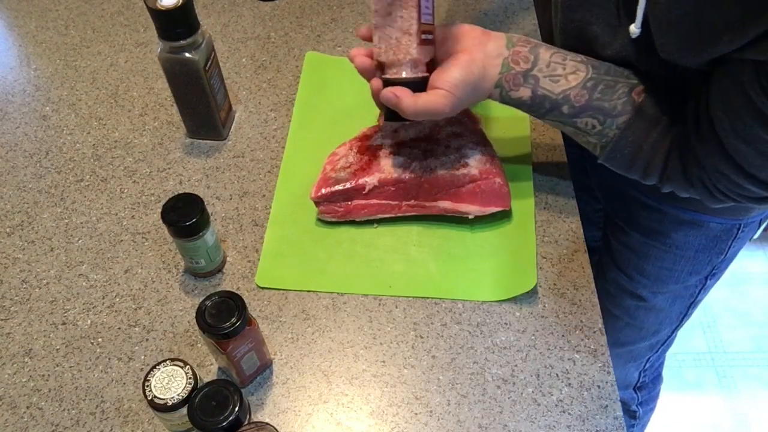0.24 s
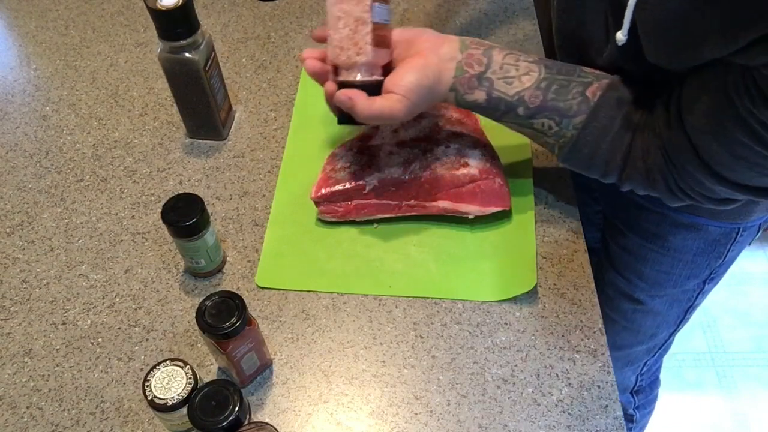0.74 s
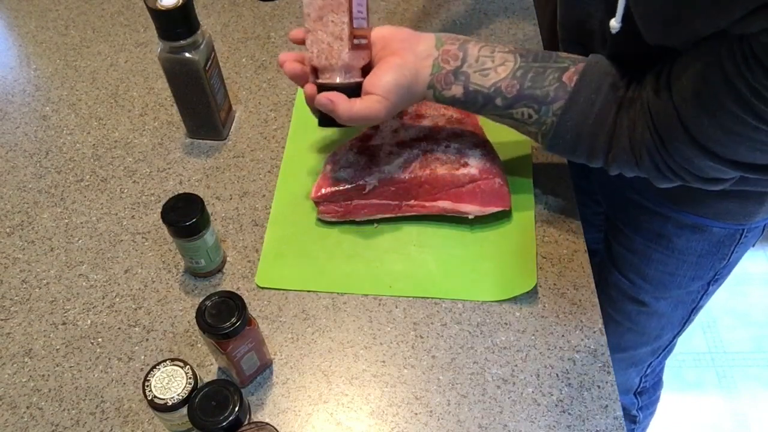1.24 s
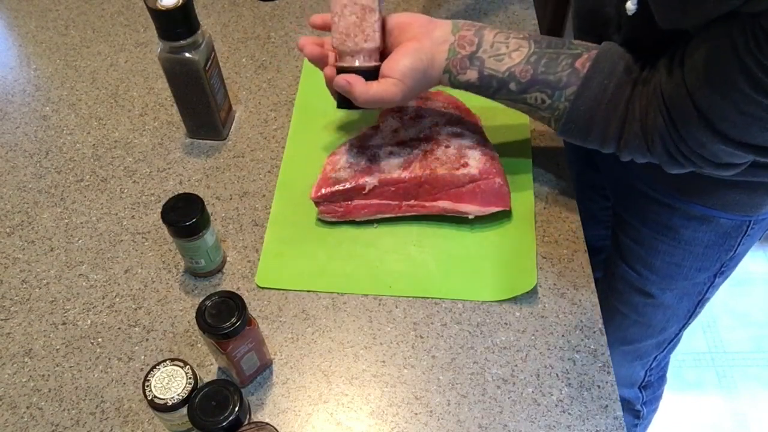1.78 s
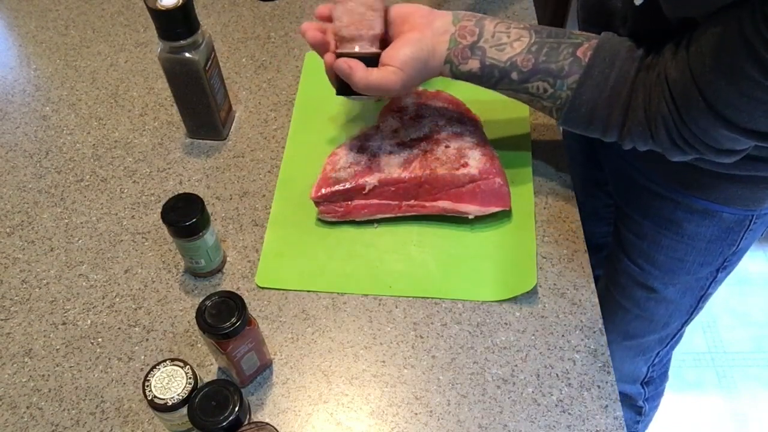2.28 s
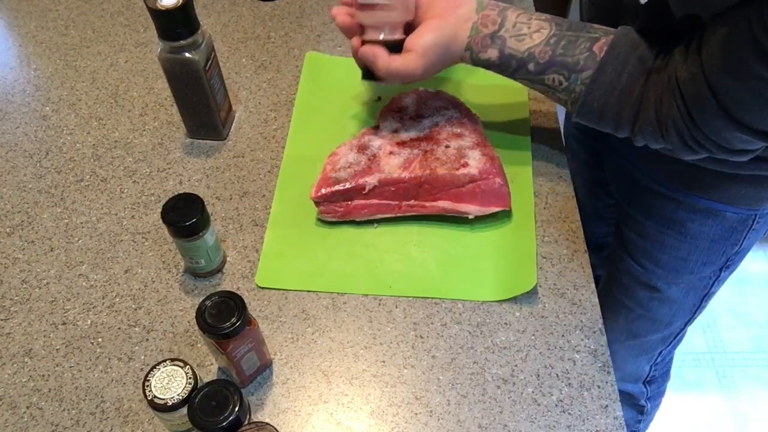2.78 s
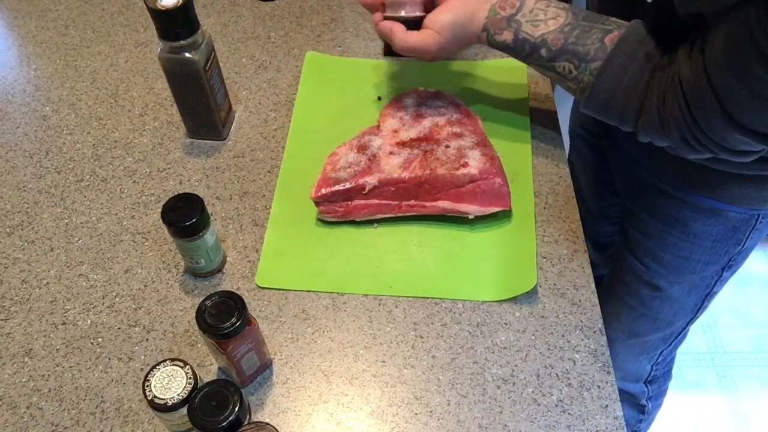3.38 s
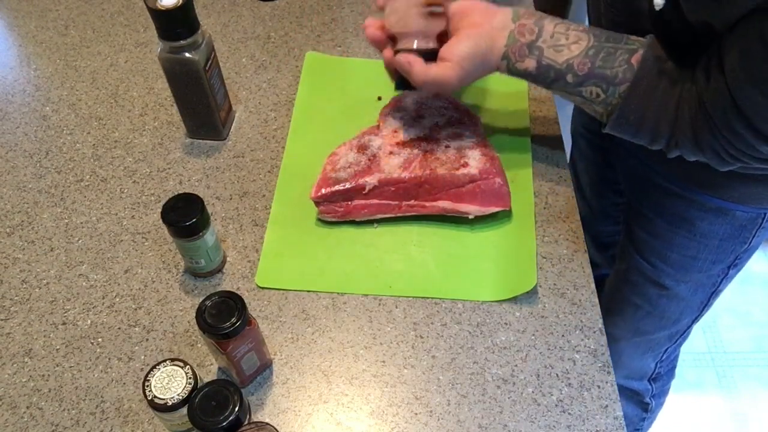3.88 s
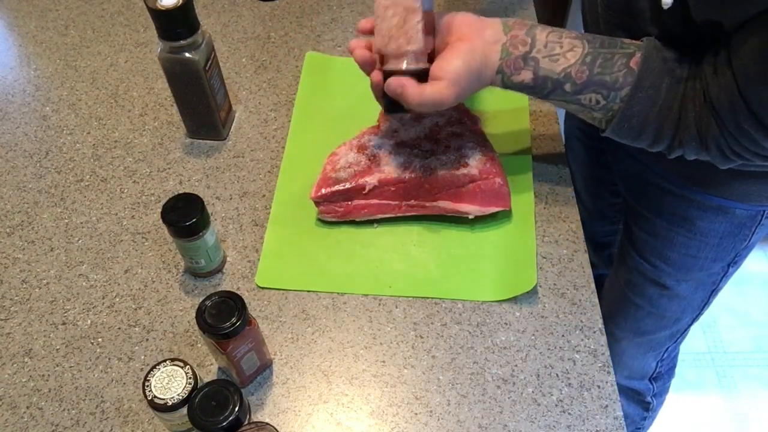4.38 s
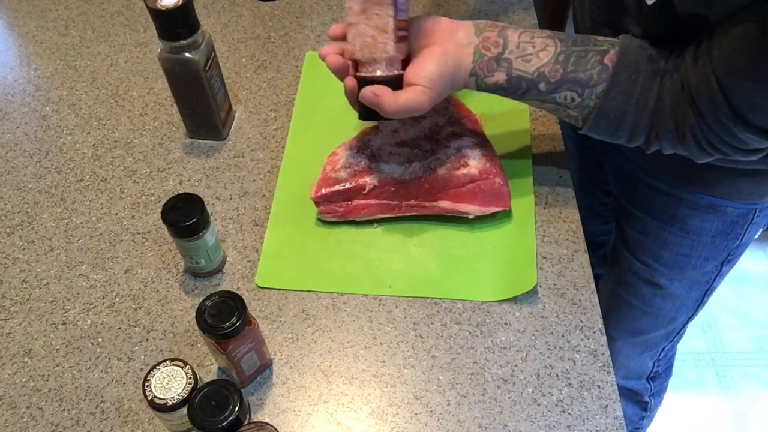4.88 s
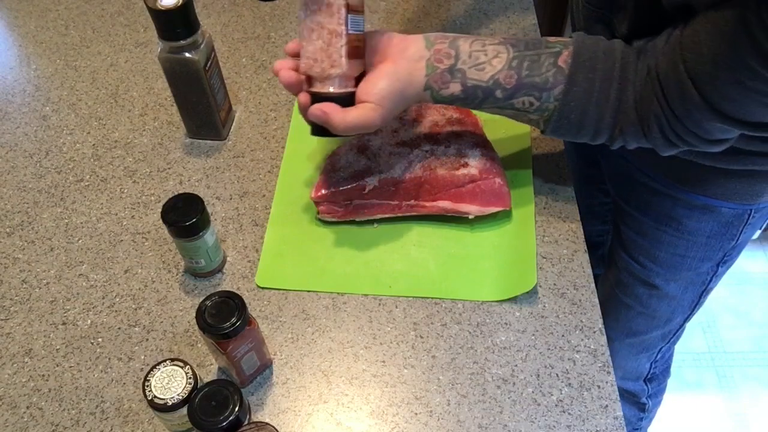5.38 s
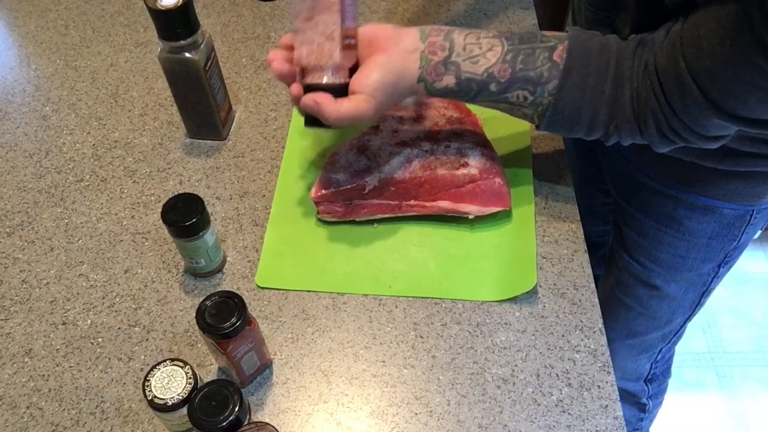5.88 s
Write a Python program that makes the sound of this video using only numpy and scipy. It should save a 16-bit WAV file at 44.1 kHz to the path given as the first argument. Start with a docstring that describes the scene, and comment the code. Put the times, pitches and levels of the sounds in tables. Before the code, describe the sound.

Eleven brief, gritty crunches come at even intervals, each about a quarter second or less, from coarse salt crushed in a hand mill. The crunch brightens into a fine scrape, sometimes ending in a snappy plastic click. In the short gaps, crystals tick lightly and a cap squeaks very faintly. Close mono microphone, slight kitchen reflections with a short tail, quiet low hum.

```python
"""Salt grinder over a kitchen counter

In a kitchen, close to a single microphone, a hand-twisted grinder makes eleven twists in an even rhythm. Each
twist crushes coarse crystals (clicks through splinter colours and ringing teeth), then rasps fine salt. Single
crystals crack, the housing knocks, the rubbed housing squeaks and the plastic burr snaps free with a ring;
between twists loose salt ticks in the mill. Echoes and a short tail answer, over a hum and soft room noise."""
import sys
import numpy as np
from scipy import signal
from scipy.fft import rfft, irfft
from scipy.io import wavfile
from scipy.ndimage import uniform_filter1d

SR = 44100
rng = np.random.default_rng(int(sys.argv[2]) if len(sys.argv) > 2 else 0)


def output_pcm(signal):
    """Save a mono or channel-first signal as 16-bit PCM at the path in sys.argv[1].

    Samples are clipped to [-1, 1] before scaling.
    """
    pcm = np.clip(np.atleast_2d(signal).T, -1, 1) * 32767
    wavfile.write(sys.argv[1], SR, np.round(pcm).astype(np.int16))


N = 270774  # samples, about 6.1 s

# Levels of the grinder's sounds are nominal: gains in the functions and in scene() come on top.
# appliance hum: (frequency [Hz], mean level [dB rms])
HUM_TONES = [(56.5, -80), (119.9, -60), (282.8, -70), (337.8, -66)]
# colour of the room noise: (frequency [Hz], density [dB per Hz])
AIR_COLOUR = [(15, 2), (30, -20), (45, 6.5), (85, 3), (140, 5.5), (210, 2), (360, 0), (480, -8), (900, -8),
              (1500, -12), (3000, -16), (6000, -18), (15000, -39)]
AIR_DB = -59.5  # rms

# twists of the hand: (teeth bite [s], full force [s], hand lets go [s], crushing [dB], rasp [dB],
#   last push [dB], weaker at the bite by [dB], crunch pitch at the start [Hz], and at the end [Hz])
HAND_TWISTS = [(-0.06, 0.004, 0.16, -38, -44.5, 0.5, 6, 2300, 3500),
               (0.455, 0.557, 0.74, -37.5, -44.5, -1, 18.5, 2260, 3400),
               (1.05, 1.118, 1.274, -37, -46, 4.5, 12, 2300, 3900),
               (1.619, 1.682, 1.813, -36, -44.5, 5, 11, 2300, 3000),
               (2.227, 2.249, 2.445, -37, -46, -1, 7, 2050, 3500),
               (2.78, 2.84, 3.003, -35.5, -46.5, 1, 14, 2500, 3100),
               (3.362, 3.411, 3.543, -34.5, -43.5, -2, 9, 2100, 3900),
               (3.942, 4.016, 4.165, -36, -45, 0.5, 11, 2000, 3200),
               (4.495, 4.566, 4.734, -36, -43.5, -3, 7, 2150, 3600),
               (5.025, 5.106, 5.27, -36.5, -45.5, 2, 13.5, 2070, 3100),
               (5.602, 5.662, 5.82, -37, -47, 4, 7, 1800, 3500)]
# the mill sticks for a moment: (middle [s], length [s], drop [dB], a negative drop is a rise)
MILL_STALLS = [(0.018, .012, 3.5), (1.739, 0.016, 3), (2.442, .025, 5.5), (2.811, 0.022, 4.5),
               (3.393, 0.018, 10), (3.488, 0.014, 3.5), (5.19, 0.032, 1), (5.75, 0.023, -1)]
BITE_DB_PER_S, RELEASE_DB_PER_S = 836, 169  # how fast a twist starts and stops
BUILD_CURVE = 1.43  # the force grows ever faster from the bite on
RASP_FOLLOWS = 0.87  # share of that growth in the rasp
COARSE_LAST_S, SPENT_DB_PER_S = 0.035, 211  # the coarse crystals last a moment, then are used up
LEFTOVER_DB = -1  # crushing of the fragments, relative to the rasp
MID_SAG_DB = 1  # the hand eases between the crunch and the last push
PUSH_S = 0.027  # decay time on either side of the last push of the wrist

# colour of crushed crystals: (frequency [Hz], density [dB per Hz])
CRUSH_COLOUR = [(50, -52), (150, -32), (400, -16.5), (620, -20.5), (800, -22), (1000, -9), (1400, -5.5),
                (2000, 1), (2600, -0.5), (3300, 0), (4200, -7.5), (6000, -12.5), (15000, -26.5)]
# colour of fine salt on the burr: (frequency [Hz], density [dB per Hz])
RASP_COLOUR = [(500, -44.5), (1500, -6), (2500, -6), (3600, 1), (4400, 0), (4850, -10), (5600, 1),
               (6200, -7), (6750, -2), (7500, -11), (9500, -9.5), (10500, -21.5), (11800, -12.5),
               (15800, -23.5)]
# ring of the burr: (multiple of its main ring [ratio], level [dB], decay t60 [s])
BURR_MODES = [(.41, -11, 0.035), (.56, -10.5, 0.011), (.74, -4, 0.013), (1.0, 0.5, 0.022),
              (1.34, -27, 0.0086), (1.6, -9, 0.028)]

# echoes from the counter and a wall: (delay [s], level [dB])
ROOM_ECHOES = [(.0036, -22.5), (0.0189, -30)]
# moments when the hand takes a new grip and moves the grinder: (time [s])
REGRIP_TIMES = [.39, .94, 1.5, 2.13, 2.68, 3.25, 3.83, 4.38, 4.94, 5.48]

# hollow knocks as the hand grips or a big crystal gives: (time [s], peak [dB], pitch [Hz])
HOUSING_KNOCKS = [(.040, -41, 630), (.390, -51.5, 950), (.657, -45, 555), (1.508, -44.5, 680),
                  (2.272, -42, 547), (2.333, -41, 930), (2.687, -46.5, 770), (4.036, -42, 610),
                  (4.064, -45, 660), (4.957, -42.5, 850), (5.061, -42, 745)]
# modes of the hand-damped housing: (multiple of the pitch [ratio], level [dB], decay t60 [s])
HOUSING_MODES = [(.66, -5.5, 0.039), (1.0, 6.5, 0.018), (1.35, 4.5, 0.012), (1.75, -5, 0.029),
                 (3.1, -26, 0.01)]
# single crystals that crack: (time [s], peak [dB], centre that sets the brightness [Hz])
CRYSTAL_CRACKS = [(0.0402, -19, 2660), (0.1045, -23, 3770), (0.391, -44.5, 2200), (0.452, -37, 3115),
                  (0.604, -28, 2570), (0.6424, -24, 2970), (0.656, -26, 2580), (0.6892, -23.5, 4010),
                  (0.9413, -36.5, 4150), (1.046, -35, 2770), (1.0635, -28, 2130), (1.6106, -35, 3080),
                  (1.6402, -24, 2570), (1.9691, -37.5, 3390), (2.2338, -23, 2590), (2.3323, -24, 2130),
                  (2.6874, -31.5, 3860), (2.7796, -26.5, 3040), (2.81, -26, 3570), (2.872, -17.5, 3200),
                  (3.003, -29, 2500), (3.2686, -38, 3630), (3.364, -27, 2400), (3.406, -21, 2640),
                  (3.6757, -34, 3720), (3.838, -39, 2840), (4.0337, -30, 2510), (4.0627, -24, 2970),
                  (4.106, -24.5, 3260), (4.3323, -42, 3550), (4.4953, -31, 2180), (4.5073, -26, 2490),
                  (4.5688, -23.5, 3090), (4.643, -23, 3260), (4.7424, -28, 3070), (4.8021, -34, 2970),
                  (4.9574, -35, 2360), (5.06, -39, 2310), (5.101, -27, 3320), (5.5188, -34.5, 3250),
                  (5.5966, -32, 2290), (5.6788, -29, 2188), (5.702, -31, 2710)]
# colour of a crack: (frequency [Hz], density [dB per Hz])
CRACK_COLOUR = [(60, -47), (200, -30), (900, -12), (2000, 5.5), (3600, 6), (7000, -8), (10500, -20),
                (12500, -25), (16000, -18)]
# the housing sings faintly as the hand rubs it: (start [s], end [s], nominal pitch [Hz], level [dB])
HOUSING_SQUEAKS = [(0.176, .46, 1665, -69.5), (.18, .46, 3300, -74), (3.62, 3.94, 3200, -71.5),
                   (4.944, 5.037, 3330, -66)]
# loose salt shifts in the mill as the hand turns back: (start [s], end [s], level [dB])
SALT_SHIFTS = [(0.397, 0.48, -65), (0.933, 1.045, -64), (1.494, 1.507, -65.5), (1.973, 2.016, -59.5),
               (2.08, 2.2, -69.5), (2.56, 2.596, -65.5), (2.696, 2.715, -67), (3.115, 3.164, -64.5),
               (3.243, 3.35, -60.5), (3.671, 3.686, -60), (3.84, 3.93, -67.5), (4.276, 4.33, -66.5),
               (4.384, 4.48, -63.5), (4.961, 5.03, -59.5), (5.485, 5.59, -63.5), (5.965, 6.078, -62.5)]
SHIFT_RISE_DB_PER_S, SETTLE_DB_PER_S = 1500, 155
# colour of loose salt: (frequency [Hz], density [dB per Hz])
LOOSE_COLOUR = [(300, -26), (900, -9.5), (1700, -2.5), (2500, -2), (3600, 1.5), (5000, -5), (7000, -8),
                (10500, -17.5), (15800, -22)]
# the burr catches and snaps free: (time of release [s], level [dB], main ring [Hz])
BURR_SNAPS = [(1.2639, -28, 4050), (1.272, -27, 4080), (1.2774, -24, 4150), (1.2826, -26.5, 3950),
              (1.817, -37.5, 4060), (2.457, -27.5, 4320), (2.9804, -31, 4080), (2.9993, -32.5, 4080),
              (3.5205, -32.5, 4400), (3.558, -31, 4260), (4.1566, -32.5, 3990), (5.2428, -32, 3870),
              (5.2587, -31, 4084), (5.814, -25.5, 4010), (5.821, -28.5, 3980)]

CUTOFF_HZ = 15820


def from_db(db):
    """Decibels to gain."""
    return 10 ** (np.asarray(db) / 20)


def rms_one(x):
    """Scale to an rms of 1."""
    return x / np.sqrt(np.mean(x ** 2) + 1e-20)


def peak_one(x):
    """Scale to a peak of 1."""
    return x / np.abs(x).max()


def add(out, s, sound):
    """Mix a short sound in at s seconds."""
    start = max(round(s * SR), 0)
    out[start:start + len(sound)] += sound[:N - start]


def through(x, pulse):
    """Pass a sound through an impulse response."""
    return signal.oaconvolve(x, pulse)[:N]


def drift(rate):
    """Random wander: `rate` new normal values a second, joined by straight lines."""
    steps = rng.standard_normal(4096)
    return np.interp(np.arange(N) / SR * rate, np.arange(len(steps)), steps)


def response(spectrum, uneven_db=0, size=1024, count=40):
    """Causal impulse response of unit energy with this colour and random bumps on it."""
    log_hz = np.log(np.maximum(np.arange(size // 2 + 1) * SR / size, 1))
    hz, db = np.transpose(spectrum)
    bump_places = np.linspace(np.log(hz[0]), np.log(hz[-1]), count)
    bumps = np.interp(log_hz, bump_places, rng.standard_normal(count))
    colour_db = np.interp(log_hz, np.log(hz), db) + uneven_db * bumps
    # folding the cepstrum onto positive times gives minimum phase
    cepstrum = irfft(np.log(from_db(colour_db)))
    cepstrum[1:size // 2] *= 2
    cepstrum[size // 2 + 1:] = 0
    pulse = irfft(np.exp(rfft(cepstrum)))
    return pulse / np.linalg.norm(pulse)


def struck(modes, hz=1, size=2048):
    """One blow on a set of decaying modes, each struck with a strength of its own; unit energy."""
    t = np.arange(size) / SR
    ring = np.zeros(size)
    for k, (ratio, db, t60) in enumerate(modes):
        decay = from_db(db + rng.normal(0, 0.27) - 60 * t / t60)
        ring += decay * np.sin(2 * np.pi * hz * ratio * t) * (-1) ** k
    return ring / np.linalg.norm(ring)


def fractures(per_s, spread_db, clump_db, clump_rate, size=900):
    """Clicks of uneven size that come in small avalanches, their local power held nearly steady."""
    uneven_db = spread_db * np.minimum(rng.exponential(1, N), 4)
    sizes = from_db(uneven_db + clump_db * drift(clump_rate))
    happens = rng.random(N) < per_s / SR
    clicks = sizes * rng.choice([-1, 1], N) * happens
    local_power = uniform_filter1d(clicks ** 2, size)
    return clicks / np.sqrt(np.maximum(local_power, 1e-4))


def grains(clicks, pulses, turn_per_s=14, count=4):
    """Each click takes one of a few colours, and the choice moves on with time as if the teeth turn."""
    place = np.arange(N) / SR * turn_per_s + count * rng.random(N)
    dealt = place.astype(int) % len(pulses)
    return sum(through(clicks * (dealt == k), pulse) for k, pulse in enumerate(pulses))


def background():
    """The hum of an appliance, slightly wavering in level and phase, over soft room noise."""
    t = np.arange(N) / SR
    hum = np.zeros(N)
    for hz, db in HUM_TONES:
        amplitude = np.sqrt(2) * from_db(db + 0.5 * drift(4.27))
        hum += amplitude * np.sin(2 * np.pi * hz * t + 0.17 * drift(2.96))
    air = through(rng.standard_normal(N), response(AIR_COLOUR, size=8192))
    return hum + from_db(AIR_DB) * rms_one(air)


def twisting():
    """Each twist bites, builds, spends its coarse crystals, eases and ends with a change of push.
    Gives the crushing level (dB), the rasp level (dB) and the pitch of the crunch (Hz)."""
    t = np.arange(N) / SR
    crushes, rasps, pitches = [], [], []
    for bite, full, let_go, crush_db, rasp_db, push_db, build_db, coarse_hz, fine_hz in HAND_TWISTS:
        # level lost before the bite and after the hand lets go
        turning_db = -BITE_DB_PER_S * np.maximum(bite - t, 0) - RELEASE_DB_PER_S * np.maximum(t - let_go, 0)
        slack_db = build_db * (1 - np.interp(t, [bite, full], [0, 1]) ** BUILD_CURVE)
        sag_db = MID_SAG_DB * np.sin(np.interp(t, [full, let_go], [0, np.pi])) ** 2
        spent_db = SPENT_DB_PER_S * np.maximum(t - full - COARSE_LAST_S, 0)
        coarse_db = crush_db - slack_db - spent_db
        last_push_db = push_db * np.exp(-np.abs(t - let_go) / PUSH_S)
        fine_db = rasp_db - RASP_FOLLOWS * slack_db - sag_db + last_push_db
        crushes.append(turning_db + np.maximum(coarse_db, fine_db + LEFTOVER_DB))
        rasps.append(turning_db + fine_db)
        pitches.append(np.interp(t, [bite, let_go], [coarse_hz, fine_hz]))
    stuck_db = sum(db * np.exp(-(2 * (t - s) / length) ** 2) for s, length, db in MILL_STALLS)
    pitch_hz = np.choose(np.argmax(rasps, axis=0), pitches)  # of the loudest twist
    return np.max(crushes, axis=0) - stuck_db, np.max(rasps, axis=0) - stuck_db, pitch_hz


def crushing(level_db, pitch_hz, t60=0.009, count=14):
    """Coarse crystals break between the teeth, the more of them the harder the hand twists."""
    per_s = 1800 * from_db(0.4 * (level_db - level_db.max()))
    clicks = fractures(per_s + 150, spread_db=3.0, clump_db=3.0, clump_rate=200, size=1200)
    colours = [response(CRUSH_COLOUR, uneven_db=2.5) for _ in range(29)]
    splinters = grains(clicks * from_db(level_db), colours, turn_per_s=25)
    # the loaded teeth stick and slip with a short ring, whose pitch shifts as the crystals get smaller
    slips = fractures(per_s / 2 + 100, spread_db=0.5, clump_db=2.5, clump_rate=160) * from_db(level_db)
    pitches = np.geomspace(1500, 4800, count)
    scattered_hz = pitch_hz * np.exp(rng.normal(0, 0.13, N))
    nearest = np.rint(np.interp(scattered_hz, pitches, np.arange(count)))
    teeth = sum(through(slips * (nearest == k), struck([(0.99, 0, t60)], hz)) for k, hz in enumerate(pitches))
    return from_db(-1.24) * splinters + from_db(-5.5) * teeth


def rasping(level_db):
    """Fine salt scrapes along the burr: bright ticks, sparse under a light hand, that set it ringing."""
    per_s = 5500 * from_db(0.65 * (level_db - level_db.max()))
    ticks = fractures(per_s + 250, spread_db=1.5, clump_db=1.5, clump_rate=200, size=1200) * from_db(level_db)
    colours = [response(RASP_COLOUR, uneven_db=3.0, count=70) for _ in range(31)]
    scrape = grains(ticks, colours, turn_per_s=22, count=3)
    rings = [struck(BURR_MODES, 4190 * (1 + rng.normal(0, 0.046))) for _ in range(11)]
    return from_db(0.16) * scrape + from_db(-3.5) * grains(ticks, rings)


def room(t60=0.28, tail_db=-12.0, dull_hz=7000, size=22050):
    """Two hard echoes and a diffuse tail whose treble dies first."""
    t = np.arange(size) / SR
    lowpass = signal.butter(2, min(dull_hz, SR / 3), fs=SR, output="sos")
    low = signal.sosfilt(lowpass, rng.standard_normal(size)) * from_db(-60 * t / t60)
    bright = 0.74 * rng.standard_normal(size) * from_db(-60 * t / 0.11)
    tail = (low + bright) * (1 - np.exp(-t / 0.0024))
    pulse = from_db(tail_db) * tail / np.linalg.norm(tail)
    for s, db in ROOM_ECHOES:
        pulse[round(s * SR * (1 + rng.normal(0, 0.04)))] += from_db(db)
    return pulse


def kitchen(x):
    """The grinder is moved between twists, so each one meets different reflections."""
    twist = np.searchsorted(REGRIP_TIMES, np.arange(N) / SR)
    return x + sum(through(x * (twist == k), room()) for k in range(len(REGRIP_TIMES) + 1))


def knocks():
    """The housing answers with a short hollow note of a few damped modes."""
    out = np.zeros(N)
    for s, db, hz in HOUSING_KNOCKS:
        add(out, s, from_db(db) * peak_one(struck(HOUSING_MODES, hz)))
    return out


def cracks(tilt_db=13.5, middle_hz=3000, size=1024):
    """A crystal splits with one sharp tick and a few milliseconds of splinters, tilted by its centre."""
    out, t = np.zeros(N), np.arange(size) / SR
    for s, db, centre_hz in CRYSTAL_CRACKS:
        tilt = tilt_db * np.log2(centre_hz / middle_hz)  # dB per octave
        colour = [(hz, level + tilt * np.clip(np.log2(hz / middle_hz), -1, 1.5)) for hz, level in CRACK_COLOUR]
        splinters = 0.12 * rng.standard_normal(size) * from_db(-60 * t / 0.011)
        splinters[0] = 1  # the tick
        crack = signal.fftconvolve(splinters, response(colour, uneven_db=4.5))
        add(out, s, from_db(db - 0.5) * peak_one(crack))
    return out


def rubbing(t60=0.05):
    """Uneven little slips make the housing ring in a thin, faint squeak."""
    out = np.zeros(N)
    slips = fractures(700, spread_db=2.0, clump_db=1.5, clump_rate=40)
    for start, end, hz, db in HOUSING_SQUEAKS:
        swell = np.interp(np.arange(N) / SR, np.linspace(start, end, 5), [0, 1, 1, 1, 0])
        out += from_db(db) * through(slips * swell, struck([(0.99, 0, t60)], hz))
    return out


def loose_salt():
    """Between twists, unloaded crystals tumble against the teeth in light ticks and settle."""
    t = np.arange(N) / SR
    levels = []
    for start, end, db in SALT_SHIFTS:
        before_db = SHIFT_RISE_DB_PER_S * np.maximum(start - t, 0)
        after_db = SETTLE_DB_PER_S * np.maximum(t - end, 0)
        levels.append(db - before_db - after_db)
    level_db = np.max(levels, axis=0)
    ticks = fractures(1400, spread_db=1.0, clump_db=2.5, clump_rate=60, size=1800) * from_db(level_db)
    colours = [response(LOOSE_COLOUR, uneven_db=2.5) for _ in range(17)]
    return from_db(5.5) * grains(ticks, colours, turn_per_s=30)


def snaps(size=1500):
    """The burr chatters as it strains on a crystal, then jumps free with a tick and a short plastic ring."""
    out = np.zeros(N)
    for s, db, hz in BURR_SNAPS:
        chatter = rng.standard_normal(size) * (rng.random(size) < 300 / SR)
        slips = 0.21 * chatter * np.linspace(0, 1, size)
        slips[-1] = 1  # the release
        blow = peak_one(struck(BURR_MODES, hz) + from_db(-9.0) * response(RASP_COLOUR, size=2048))
        add(out, s - size / SR, from_db(db + 1.0) * signal.fftconvolve(slips, blow))
    return out


def scene():
    """The grinder with its kitchen reflections, over the background; one channel."""
    crush_db, rasp_db, pitch_hz = twisting()
    grinder = crushing(crush_db, pitch_hz) + rasping(rasp_db)
    grinder += knocks() + cracks() + rubbing() + loose_salt() + snaps()
    return (from_db(0.31) * kitchen(grinder) + background())[None]


def record(dry):
    """The microphone channel: a steep elliptic low-pass cuts the top."""
    lowpass = signal.ellip(12, 0.1, 70, CUTOFF_HZ, fs=SR, output="sos")  # 0.1 dB ripple, 70 dB down
    return signal.sosfilt(lowpass, dry)


dry = scene()
out = record(dry)
output_pcm(out)
```